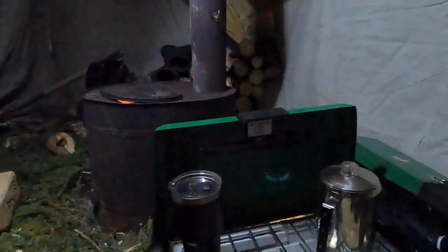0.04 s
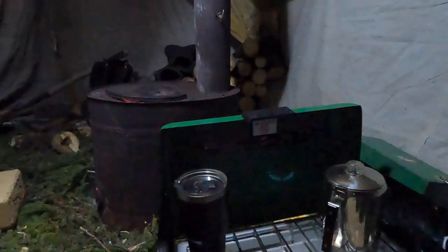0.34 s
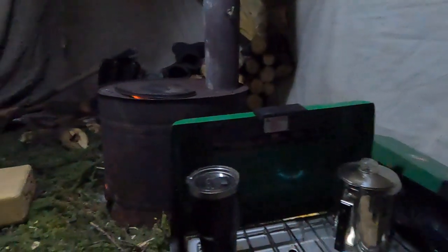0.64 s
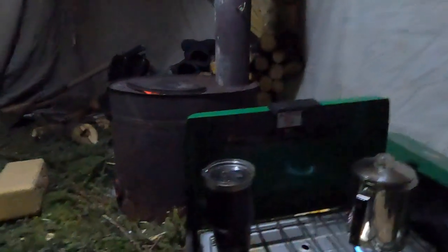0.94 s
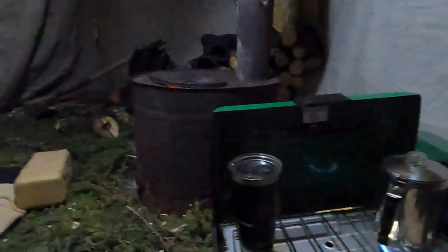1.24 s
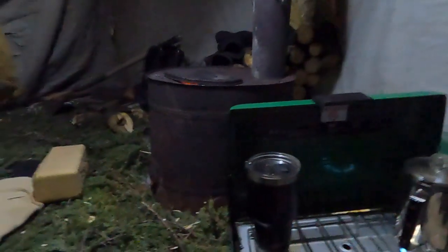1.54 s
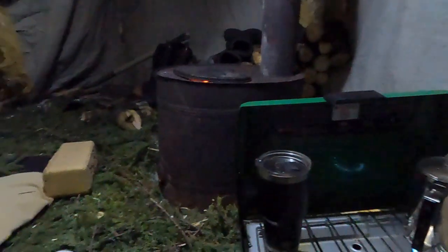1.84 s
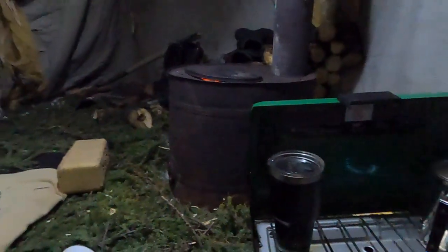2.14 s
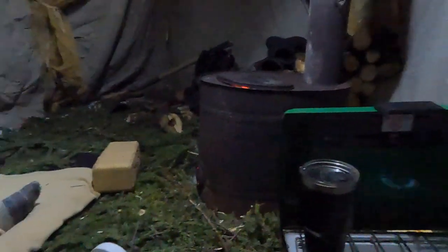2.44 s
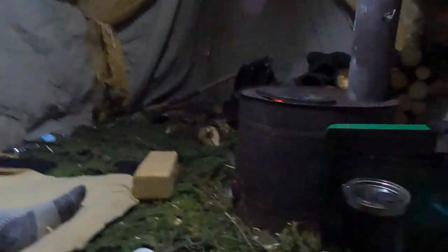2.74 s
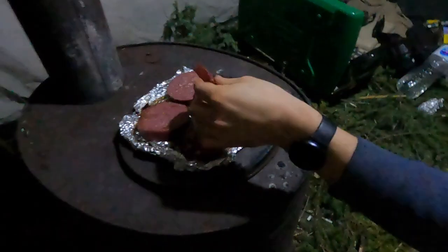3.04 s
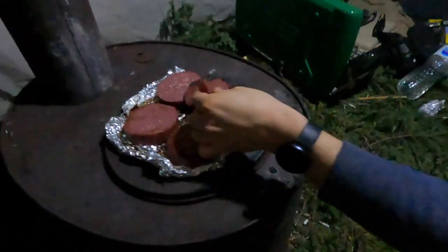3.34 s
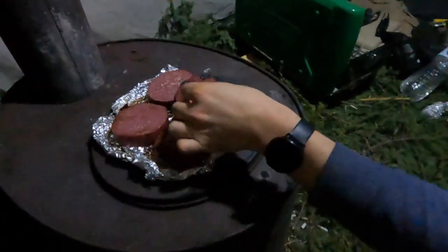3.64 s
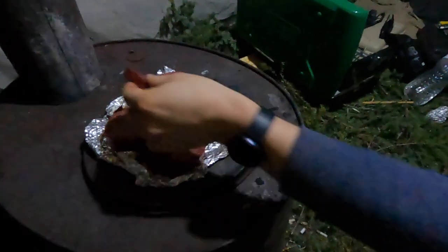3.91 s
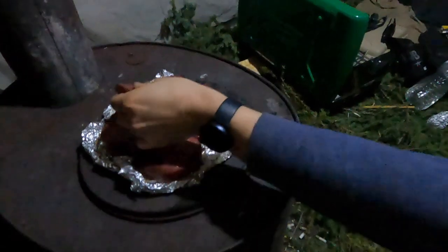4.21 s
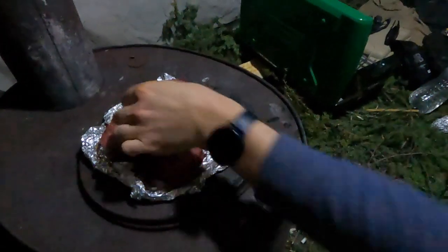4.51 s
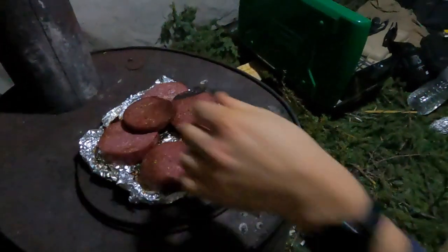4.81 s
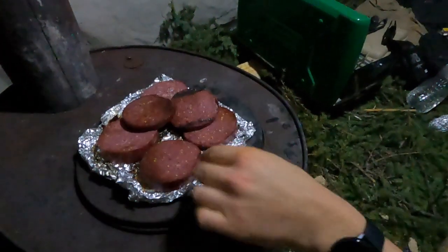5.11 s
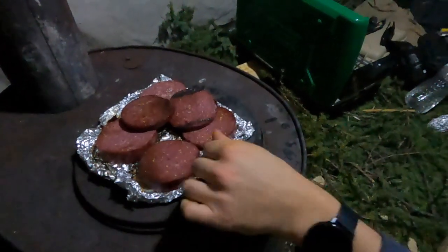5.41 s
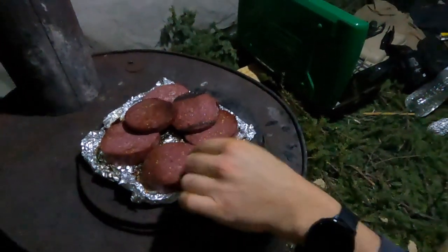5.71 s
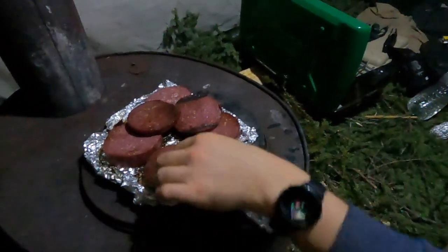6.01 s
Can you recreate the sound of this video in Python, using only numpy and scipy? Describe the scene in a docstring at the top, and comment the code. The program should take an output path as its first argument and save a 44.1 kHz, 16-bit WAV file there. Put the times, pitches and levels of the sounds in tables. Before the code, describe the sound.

A steel percolator bubbles and clacks on a gas camp stove, then meat slices sizzle and spit on foil on a wood stove.

```python
"""Steam bubbles thump in a steel percolator on a gas camp stove. Steam pockets collapse against the
metal; spurts gurgle up the stem and splash under the lid. After a short gap with one crackle, meat
sizzles close by on foil on a wood stove in a tent: countless tiny bursts of steam in hot fat.
Blisters spit, a hand lays a slice down, the frying flares and the stove top rings softly."""
import sys
import numpy as np
from scipy import signal
from scipy.fft import rfft, irfft, next_fast_len
from scipy.io import wavfile
from scipy.ndimage import map_coordinates

SR = 44100
rng = np.random.default_rng(int(sys.argv[2]) if len(sys.argv) > 2 else 0)


def file_out(sig):
    """Save sig as 16-bit WAV at sys.argv[1]."""
    # one column per channel
    cols = np.atleast_2d(sig).T
    # limit, then scale
    lim = np.clip(cols, -1, 1)
    pcm = np.round(lim * 32767).astype(np.int16)
    wavfile.write(sys.argv[1], SR, pcm)


N = 267246
TIME_S = np.arange(N) / SR
RING_S = np.arange(SR // 8) / SR  # time axis of one hit
POT_END_S, FRY_START_S, SLICE_LANDS_S = 2.846, 3.015, 4.403
SNAP_LEAD_S = .0015  # snap onset to peak

# Table levels are relative; each source adds its own gain.
# single steam bubbles (time [s], level [dB], pitch [Hz], decay [s])
STEAM_BUBBLES = [(.012, -26, 240, 0.0053), (0.075, -28, 238, .006), (.118, -39.5, 237, .009),
                 (.165, -34, 378, 0.0036), (.214, -27, 259, 0.0034), (.245, -25.5, 240, 0.006),
                 (.338, -22.5, 228, .005), (.395, -34, 203, 0.013), (0.472, -29.5, 230, 0.0068),
                 (0.525, -32, 211, 0.009), (0.541, -36, 235, 0.0074), (0.58, -30.5, 221, 0.012),
                 (0.643, -33.5, 234, 0.012), (0.858, -35, 257, .007), (0.906, -32.5, 249, 0.017),
                 (0.992, -40.5, 214, 0.0076), (1.110, -29.5, 241, 0.022), (1.25, -32.5, 237, 0.018),
                 (1.307, -29.5, 211, 0.0031), (1.378, -38.5, 260, 0.0089), (1.186, -26, 234, 0.0049),
                 (1.429, -20.5, 219, 0.01), (1.4435, -23, 230, 0.0077), (1.494, -19, 218, .008),
                 (1.554, -29, 231.4, 0.024), (1.656, -31.5, 235, 0.0054), (1.738, -32.5, 259, 0.01),
                 (1.797, -33, 198, 0.0093), (1.825, -34, 370, 0.0065), (1.880, -37.5, 260, .006),
                 (1.932, -40.5, 261, 0.0043), (1.980, -27, 226.5, 0.0055), (2.096, -23, 254, 0.01),
                 (2.217, -25, 227, 0.0094), (2.284, -33, 218, 0.0068), (2.391, -29, 220, 0.0085),
                 (2.445, -41, 249, 0.0067), (2.542, -34, 237, 0.01), (2.741, -29, 229, 0.0035),
                 (2.812, -35, 203, .006)]
# steam pockets collapsing on the metal (time [s], clack [dB], knock [dB], thump [dB])
STEAM_COLLAPSES = [(0.3008, -28, -39, -25.5), (0.3304, -26, -28, -36), (0.6929, -14.5, -24.5, -19),
                   (0.7176, -36, -47, -43), (0.7496, -42, -48, -43.5), (0.7788, -19, -22, -24),
                   (0.7869, -26, -25.5, -27.5), (0.8031, -43, -28, -23.5), (.817, -48, -32, -35),
                   (1.1618, -29.5, -27.5, -25), (1.173, -30, -32, -25), (1.19, -32, -31, -26.5),
                   (1.4268, -36, -29, -33.5), (1.4575, -26, -23, -22.5), (1.4733, -30, -26, -18.5),
                   (1.4984, -30.5, -38, -35), (1.5097, -21, -19.5, -19), (1.5328, -36, -41, -34),
                   (1.543, -47, -27.5, -27), (2.1102, -34.5, -30.5, -28.5), (2.182, -45, -23, -25),
                   (2.2072, -42, -32, -29.5), (2.247, -27.5, -43, -39.5), (2.6395, -32, -32, -32),
                   (2.6472, -20.5, -23.5, -18.5), (2.6987, -46, -29, -33), (2.7419, -38, -37, -29.5),
                   (2.7795, -46, -31, -34.5)]
# spurts up the stem (time [s], length [s], gurgle [dB])
STEM_SPURTS = [(0.314, .032, -37), (.682, .025, -40), (0.762, .058, -38.5), (1.141, .057, -39),
               (1.402, .122, -37.5), (2.091, 0.032, -46.5), (2.173, .066, -41.5), (2.629, .034, -39.5),
               (2.691, 0.093, -52.5)]
# hoots of the stem (time [s], length [s], level [dB])
STEM_HOOTS = [(0.086, 0.023, -38), (1.09, 0.056, -38), (1.864, 0.034, -38.5), (2.012, 0.125, -33),
              (2.59, 0.061, -39.5)]
# splashes under the lid (time [s], level [dB])
LID_SPLASHES = [(0.0615, -40), (0.147, -43), (0.627, -36), (1.039, -43), (1.362, -41.5), (1.4148, -37.5),
                (1.872, -35.5)]
# wisps of steam (time [s], decay [s], level [dB])
STEAM_WISPS = [(0.561, 0.008, -69), (1.088, 0.034, -59.5), (1.128, 0.017, -70), (2.0329, 0.008, -72),
               (2.114, 0.008, -64), (2.2584, 0.01, -61), (2.609, 0.011, -46), (2.645, 0.034, -57),
               (2.792, 0.0091, -62)]
# drops on hot steel (time [s], level [dB], pitch [Hz])
STRAY_DROPS = [(0.248, -49, 3980), (.3215, -55, 6000), (.3386, -52, 6100), (0.372, -40, 3140),
               (.3875, -54, 5900), (.4244, -57, 5600), (0.5607, -47.5, 6300), (0.7377, -50.5, 6100),
               (.7796, -51, 6100), (.9767, -50.5, 5670), (1.488, -58.5, 11060), (1.5105, -52.5, 6140),
               (1.784, -64, 11800), (1.817, -62.5, 11800), (2.034, -51, 6320), (2.1161, -58.5, 10660),
               (2.2625, -49, 5600), (2.6873, -46, 5700), (2.7926, -49, 5370)]
# resonances of the filled pot and lid (frequency [Hz], bandwidth [Hz], level [dB])
CLACK_MODES = [(2310, 100, 14.5), (2540, 80, -0.5), (2753, 39, 9.5), (2996, 95, 10), (3133, 79, 8.5),
               (2700, 530, -10.5)]
KNOCK_MODES = [(378, 24, 3), (716, 70, 2), (812, 330, -4.5), (1517, 35, -14)]
SPLASH_MODES = [(1228, 63, 17), (1410, 140, 0.5), (1436, 38, 20.3)]
# spectra of flame, steam and fine drops (frequency [Hz], gain [dB])
FLAME_SPECTRUM = [(25, -40.5), (50, -28), (80, -10), (110, -24.5), (160, -7), (230, -4), (330, -14.5),
                  (410, -7.5), (520, -11), (740, -16.5), (950, -23), (1500, -26.5), (1750, -26.5),
                  (6000, -44.5), (8500, -63), (12300, -60.5), (14500, -87)]
STEAM_SPECTRUM = [(2500, -9), (4000, -4.5), (5900, 2), (6700, 0), (7300, -1), (8200, -16), (12000, -15),
                  (14500, -39.5)]
SPATTER_SPECTRUM = [(400, -13), (1200, -2), (2600, 7), (3300, 1), (3800, -6.5), (4700, -28.5), (6100, -15),
                    (7500, -32), (9000, -46), (12000, -36), (14500, -60.5)]

# frying strength (time [s], level [dB])
SIZZLE_ENVELOPE = [(3.1, -38.5), (3.45, -37), (3.75, -35), (4.0, -30.5), (4.3, -30), (4.6, -31),
                   (4.9, -32.5), (5.02, -32), (5.42, -31.5), (5.68, -33), (6.03, -33.5)]
# spectra of the frying layers, low to high (frequency [Hz], gain [dB])
SPUTTER_SPECTRUM = [(30, -16), (70, -33), (130, -22), (190, -3.5), (270, -4), (450, -1), (900, -0.5),
                    (1400, 7.5), (2500, -43.5)]
SIZZLE_SPECTRUM = [(100, -22.5), (500, -14), (800, -7.5), (1400, 2.5), (2200, 7.5), (3000, 6.5), (4200, 6),
                   (6200, -10.5), (8500, -25.5), (12000, -41.5)]
SPRAY_SPECTRUM = [(2500, -36), (4200, 5.5), (5500, 5.5), (7000, -6.5), (8500, -17), (10500, -14.5),
                  (14500, -35)]
MIST_SPECTRUM = [(5000, -38), (8500, -13), (10000, 0), (12500, 7.5), (14500, -18.5)]
# fingers squeeze out juice (time [s], half width [s], spray boost [dB], sputter boost [dB])
FINGER_PRESSES = [(3.53, 0.1, -5, 5.5), (4.36, 0.26, 7.5, 3)]
# bursting fat blisters (time [s], level [dB], pitch [Hz], ping [0-1], air push [0-1])
FAT_SPITS = [(3.3015, -9.5, 3100, .25, 0), (3.4833, -14.5, 4100, .3, 0), (3.628, -16, 2600, .3, 0),
             (3.8446, -11, 2250, .3, 0), (3.8667, -11, 2900, .3, 0), (4.1755, -12, 4200, .3, 0),
             (4.2660, -9.5, 2150, .3, 0), (4.2748, -8, 2350, .2, .3), (4.2912, -13, 3000, .3, 0),
             (4.3078, -5.5, 4200, .3, .2), (4.3182, -11, 3500, .3, 0), (4.3718, -13, 3600, .3, 0),
             (4.3845, -13, 2600, .3, 0), (4.4157, -11, 4200, .3, 0), (4.4447, -14, 2500, .3, 0),
             (4.6922, -8, 2050, .1, .2), (4.7889, -15, 2450, .3, 0), (4.9494, -14, 2880, .3, 0),
             (4.9834, -14, 2250, .3, 0), (5.0405, -15, 3300, .3, 0), (5.065, -15, 2200, .3, 0),
             (5.2569, -12, 3180, .3, 0), (5.3203, -11, 2230, .4, 0), (5.3705, -10.5, 1250, .2, .3),
             (5.4502, -3, 3950, .6, .8), (5.636, -14, 4100, .3, 0), (5.7323, -17.5, 1300, .1, .6),
             (5.8937, -6, 4000, .45, .8), (5.9208, -14, 3300, .3, 0), (5.9677, -13.5, 2200, .2, 0),
             (6.0206, -14.5, 3000, .3, 0)]
# crackles of juice on hot foil (time [s], half width [s], level [dB], pitch [Hz])
JUICE_RUSHES = [(4.32, .14, -33, 3400), (4.72, .12, -41, 2300), (5.0, .04, -37, 2100),
                (5.07, .02, -38, 2100), (5.2, .04, -39, 2100), (5.3, .05, -38, 2200)]
# tiniest blisters (time [s], level [dB])
TINY_BLISTERS = [(4.4443, -26.5), (4.544, -33.5), (4.6448, -28.5), (4.7437, -30.5), (4.9618, -29),
                 (5.2763, -31.5), (5.353, -32.5), (5.8774, -32.5)]
# hand bumps on the stove (time [s], level [dB], pitch [Hz])
HAND_BUMPS = [(3.241, -49, 200), (3.329, -42.5, 199), (3.384, -35.5, 190), (3.4, -41.5, 85),
              (3.464, -40, 189), (3.501, -43, 224), (3.515, -50, 90)]
# stove top resonances (frequency [Hz], level [dB], T60 [s])
STOVE_MODES = [(250, 7, .62), (265, -3.5, 2.7), (406, 10, .35), (566, 5.5, .42), (720, 3, .16),
               (890, 6, .15)]
# reflections off stovepipe, hand and canvas (delay [s], gain [dB])
TENT_REFLECTIONS = [(.0019, -53), (.0034, -36.5), (.0057, -53), (.0083, -21.5), (0.0144, -26.5)]


def boiling(churn_per_s=44, churn_db=9.5):
    """Bubbles plop singly, at each collapse and in trains at each spurt; small ones simmer and tick."""
    out = np.zeros(N)
    for s, db, hz, decay_s in STEAM_BUBBLES:
        add(out, s - .001, amp(db) * plop(hz, decay_s))
    for s, _, _, thump_db in STEAM_COLLAPSES:
        add(out, s - .001, sized_bubble(thump_db))
    for s, length_s, db in STEM_SPURTS:
        count = max(1, round(length_s * churn_per_s))
        for progress in (np.arange(count) + rng.uniform(.15, .85, count)) / count:
            swell = np.sqrt(np.sin(np.pi * progress))
            add(out, s + progress * length_s, swell * sized_bubble(db + churn_db))
    simmer = convolve(pulses(50, 2), ring([(222, 45, 0), (280, 50, -6), (395, 40, -6)], attack_s=.002))
    ticks = sum(amp(3 * wobble(9)) * convolve(pulses(28, 3), ring([(hz, 120, 0)], attack_s=.001))
                for hz in (720, 1130, 1330, 1480, 1560))
    stove_note = convolve(out, ring([(85, 11, 0)], attack_s=.0075))
    return out + amp(-52) * unit(simmer) + amp(-57.5) * unit(ticks) + amp(-71.5) * unit(stove_note)


def plop(hz, decay_s):
    """A steam bubble swells, so its note sinks; the pot heaves a little."""
    note = thump(hz, rise_s=.003, decay_s=decay_s, bend=.7, settle_s=.003)
    heave = thump(139.6, rise_s=.0014, decay_s=.0096, bend=.19, settle_s=.0028)
    return note + .18 * heave


def sized_bubble(db, base_hz=174, hz_per_db=2):
    """A stronger bubble is larger, hence lower."""
    hz = (base_hz - hz_per_db * db) * np.exp(.11 * rng.standard_normal())
    return amp(db) * plop(hz, decay_s=.0091)


def perking(rattle_db=-11):
    """Steam pockets collapse; slugs of coffee rise up the stem, rattle the pot and splash the lid."""
    out = np.zeros(N)
    for s, clack_db, knock_db, _ in STEAM_COLLAPSES:
        clack = ring(CLACK_MODES, attack_s=.001, detune=.006)
        splat = ring([(2800, 800, 0)], attack_s=.0006, detune=.05)
        cave_in = ring(CLACK_MODES, attack_s=.001, detune=.08)
        knock = ring(KNOCK_MODES, attack_s=.00085, detune=.049)
        add(out, s - .0025, amp(clack_db - 16) * cave_in)
        add(out, s, amp(clack_db - 3.5) * clack)
        add(out, s + .000692, amp(clack_db - 6.5) * splat)
        add(out, s - .001, amp(knock_db - 1) * knock)
    rattle_modes = CLACK_MODES + [(3000, 900, -2)]
    for s, length_s, db in STEM_SPURTS:
        gurgle = flurry(KNOCK_MODES, length_s, per_s=200, spread_db=3, attack_s=.0012, detune=.05)
        rattle = flurry(rattle_modes, length_s, per_s=130, spread_db=3, attack_s=.0008, detune=.006)
        add(out, s, amp(db) * (gurgle + amp(rattle_db) * rattle))
    for s, db in LID_SPLASHES:
        add(out, s, amp(db + 1.5) * ring(SPLASH_MODES, attack_s=.00048, detune=.022))
        drops = flurry(SPLASH_MODES, length_s=.04, per_s=350, spread_db=2, attack_s=.0005, detune=.1)
        add(out, s - .004, amp(db - 15.5) * drops)
    return out


def frying(melt_s=.65):
    """Tiny steam bursts in hot fat sizzle; spray, sputter and stereo mist grow as the fat melts."""
    sizzle_db = np.interp(TIME_S, *np.transpose(SIZZLE_ENVELOPE))
    cold = np.exp(-np.maximum(TIME_S - FRY_START_S, 0) / melt_s)
    spray_db = sizzle_db - 8 - 8 * cold
    sputter_db = sizzle_db - 13 - 11.5 * cold
    mist_db = sizzle_db - 23.5 - 23 * cold
    for s, half_width_s, spray_boost_db, sputter_boost_db in FINGER_PRESSES:
        press = gaussian(s, half_width_s)
        spray_db += spray_boost_db * press
        sputter_db += sputter_boost_db * press
    flicker_db = .18 * wobble(25)
    small_bursts = patter(SIZZLE_SPECTRUM, per_s=8000, spread_db=3.5)
    large_bursts = np.zeros(N)
    for hz in np.geomspace(1650, 4400, num=6):
        blister = unit(ring([(hz, .4 * hz, 0)], attack_s=.00022))
        large_bursts += amp(2.5 * wobble(14)) * convolve(pulses(100, 4.5), blister)
    sizzle = amp(sizzle_db + flicker_db) * (small_bursts + amp(-4) * unit(large_bursts))
    spray = amp(spray_db + flicker_db) * patter(SPRAY_SPECTRUM, per_s=5000, spread_db=6)
    sputter = amp(sputter_db + 2.6 * wobble(18)) * patter(SPUTTER_SPECTRUM, per_s=3200, spread_db=1)
    return sizzle + spray + sputter + fat_mist(mist_db)


def fat_mist(db):
    """The finest bursts: a haze with single pricks, its top in antiphase between the ears."""
    haze = patter(MIST_SPECTRUM, per_s=3400, spread_db=.5)
    pricks = patter(MIST_SPECTRUM, per_s=70, spread_db=6)
    mid = amp(1) * (haze + pricks / 2)
    side_spectrum = [(3000, -28), (10200, -28.5), (11200, 1.5), (12500, 15.5), (14500, -3)]
    side = patter(side_spectrum, per_s=7000, spread_db=5.5) * np.array([[1], [-1]])
    balance = amp([[-.8], [.8]])
    return amp(db + 2.8 * wobble(24)) * (mid + side) * balance


def spits():
    """Fat blisters snap, singly or in rushes; large ones add a low pop and a push of air."""
    out = np.zeros(N)
    pop = thump(1400, rise_s=.0002, decay_s=.0005, bend=.6, settle_s=.0005)
    push = thump(290, rise_s=.0004, decay_s=.003, bend=3.5, settle_s=.001)
    for s, db, hz, ping, air in FAT_SPITS:
        add(out, s + .0002 - SNAP_LEAD_S, amp(db) * snap(hz, ping))
        add(out, s, amp(db) * air * (push / 12.5 - pop / 3.5))
    for s, half_width_s, db, hz in JUICE_RUSHES:
        rush = sum(convolve(pulses(60, 3), snap(ratio * hz)) for ratio in (.75, 1, 1.3))
        out += amp(db) * gaussian(s, half_width_s) * unit(rush)
    for s, db in TINY_BLISTERS:
        add(out, s + .001, amp(db) * ring([(11800, 1500, 0)], attack_s=.0001, detune=.04))
    return out


def snap(hz, ping=.2, half_width_cycles=.52, decay_cycles=3.2):
    """A blister bursts: one sharp pressure swing, then a brief ping."""
    cycles = (RING_S - SNAP_LEAD_S) * hz
    cycles_after = np.maximum(cycles, 0)
    wave = np.cos(2 * np.pi * cycles)
    dc_offset = np.exp(-(np.pi * half_width_cycles) ** 2)
    swing = np.exp(-(cycles / half_width_cycles) ** 2) * (wave - dc_offset)
    tail = (1 - np.exp(-cycles_after ** 2)) * np.exp(-cycles_after / decay_cycles) * wave
    return -swing - ping * tail


def hand(ring_db=-43):
    """Knuckles bump the stove; a slice lands with a dull pat and the iron top rings."""
    bumps = np.zeros(N)
    for s, db, hz in HAND_BUMPS:
        add(bumps, s, amp(db) * thump(hz, rise_s=.0031, decay_s=.011, bend=.074, settle_s=.0015))
    age_s = np.maximum(TIME_S - SLICE_LANDS_S, 0)
    pat_spectrum = [(30, -25), (80, -1), (170, -22), (400, 2),
                    (650, 5), (900, 5), (1300, -6), (6000, -59)]
    pat = amp(-30) * np.exp(-age_s / .03) * patter(pat_spectrum, per_s=1800, spread_db=5.5)
    iron = sum(amp(db - 60 * age_s / t60_s + 2.4 * wobble(45)) * np.sin(2 * np.pi * hz * age_s)
               for hz, db, t60_s in STOVE_MODES)
    # bubbling fat sustains the plate's low note
    hum = unit(convolve(pulses(300, .5), ring([(272, 15, 0)])))
    onset = 1 - np.exp(-age_s / .013)
    return bumps + onset * (pat + amp(ring_db) * iron + amp(-54.5 - 12 * age_s) * hum)


def spatter(shower_db=-14.5, linger_s=.02):
    """Fine drops fly around each spurt; strays spit on the hot steel."""
    shower = sum(amp(db + shower_db) * gaussian(s + length_s / 2, length_s / 2 + linger_s)
                 for s, length_s, db in STEM_SPURTS)
    out = shower * patter(SPATTER_SPECTRUM, per_s=900, spread_db=4)
    for s, db, hz in STRAY_DROPS:
        modes = [(hz, hz / 9, 0), (.7 * hz, hz / 6, -10)]
        pings = flurry(modes, length_s=.014, per_s=600, spread_db=2.5, attack_s=.0003, detune=.05)
        add(out, s - .004, amp(db - 2.5) * peak(pings))
    return out


def stem_hoots(hz=405):
    """Air in the stem sounds a brief, wavering note."""
    swell = sum(amp(db) * np.interp((TIME_S - s) / length_s, [0, .06, .8, 1], [0, .6, 1, 0])
                for s, length_s, db in STEM_HOOTS)
    phase = 2 * np.pi * np.cumsum(hz * (1 + .0098 * wobble(60))) / SR
    return amp(1.4 * wobble(100)) * swell * np.sin(phase)


def burner(db=-46.5):
    """The gas flame rushes with a slight flutter."""
    flutter_db = 1.1 * wobble(22)
    return amp(db + flutter_db) * unit(colour(rng.standard_normal(N), FLAME_SPECTRUM))


def steam(spurt_fizz_db=-42.5):
    """Steam fizzes in wisps and with each spurt, over faint ticks."""
    puffs = np.zeros(N)
    for s, decay_s, db in STEAM_WISPS:
        onset = 1 - np.exp(-RING_S / (.087 * decay_s))
        add(puffs, s, amp(db) * onset * np.exp(-RING_S / decay_s))
    for s, length_s, db in STEM_SPURTS:
        add(puffs, s, amp(db + spurt_fizz_db) * np.hanning(int(length_s * SR)))
    fizz = patter(STEAM_SPECTRUM, per_s=4000, spread_db=7.5)
    ticks = patter(MIST_SPECTRUM, per_s=40, spread_db=5)
    return puffs * fizz + amp(-96) * ticks


def crackle(start_s=2.8765, end_s=2.8875, db=-44):
    """One short noise burst in the gap between pot and frying."""
    gate = (TIME_S > start_s) & (TIME_S < end_s)
    burst = colour(gate * rng.standard_normal(N), SIZZLE_SPECTRUM)
    return amp(db) * burst / np.std(burst[gate])


def tent_echoes(x):
    """Weak early reflections; canvas and a floor of boughs leave no tail."""
    out = x.copy()
    for delay_s, db in TENT_REFLECTIONS:
        lag = round(delay_s * SR)
        out[..., lag:] += amp(db) * x[..., :-lag]
    return out


def ring(modes, attack_s=.0011, scatter_db=1.5, detune=0):
    """One cushioned blow on modes (frequency [Hz], bandwidth [Hz], level [dB]), randomly varied."""
    hz, width_hz, db = np.transpose(modes)[:, :, None]
    hz = hz * np.exp(detune * rng.standard_normal(hz.shape))
    polarity = (-1) ** np.arange(len(hz))[:, None]
    gain = polarity * width_hz * amp(db + scatter_db * rng.standard_normal(hz.shape))
    partials = gain * np.exp(-np.pi * width_hz * RING_S) * np.sin(2 * np.pi * hz * RING_S)
    onset = 1 - np.exp(-(RING_S / attack_s) ** 2)
    return peak(onset * partials.sum(axis=0))


def thump(hz, rise_s, decay_s, bend, settle_s):
    """A damped swing whose pitch sinks to hz."""
    pitch_hz = hz * (1 + bend * np.exp(-RING_S / settle_s))
    envelope = (1 - np.exp(-(RING_S / rise_s) ** 2)) * np.exp(-RING_S / decay_s)
    return peak(envelope * np.sin(2 * np.pi * np.cumsum(pitch_hz) / SR))


def flurry(modes, length_s, per_s, spread_db, attack_s, detune):
    """An uneven run of small hits that swells and fades; energy of rms 1 over length_s."""
    out = np.zeros(SR // 2)
    hits = max(3, int(length_s * per_s))
    progresses = (np.arange(hits) + rng.random(hits)) / hits
    sizes = amp(spread_db * rng.standard_normal(hits))
    for progress, size in zip(progresses, sizes):
        hit = size * ring(modes, attack_s, detune=detune)
        add(out, progress * length_s, np.sin(np.pi * progress) * hit)
    return out / np.sqrt(np.sum(out ** 2) / (length_s * SR))


def patter(spectrum, per_s, spread_db):
    """Random impulses shaped by a spectrum; rms 1."""
    return unit(colour(pulses(per_s, spread_db), spectrum))


def pulses(per_s, spread_db):
    """Random impulses of log-normal size; rms 1."""
    places = np.flatnonzero(rng.random(N) < per_s / SR)
    sizes = amp(spread_db * np.clip(rng.standard_normal(N)[places], -2.5, 2.5))
    return unit(np.bincount(places, sizes * (-1.0) ** places, N))


def colour(x, spectrum, size=16384):
    """Minimum-phase filter through (frequency [Hz], gain [dB]) points."""
    hz, db = np.transpose(spectrum)
    gain_db = np.interp(np.log(np.fft.rfftfreq(size, 1 / SR) + 1), np.log(hz + 1), db)
    cepstrum = irfft(np.log(amp(gain_db) + 1e-6))[:size // 2]
    cepstrum[0] /= 2
    response = irfft(np.exp(rfft(2 * cepstrum, size)))[:size // 2]
    return convolve(x, response)


def wobble(knots_per_s):
    """Smooth random curve."""
    knots = rng.standard_normal(int(N * knots_per_s / SR) + 4)
    return map_coordinates(knots, [TIME_S * knots_per_s])


def gaussian(centre_s, half_width_s):
    return np.exp(-((TIME_S - centre_s) / half_width_s) ** 2)


def convolve(x, response):
    return signal.oaconvolve(x, response)[:N]


def add(track, start_s, sound):
    start = max(0, round(start_s * SR))
    span = track[start:start + len(sound)]
    span += sound[:len(span)]


def amp(db):
    return 10 ** (np.asarray(db) / 20)


def unit(x):
    return x / np.sqrt(np.mean(x ** 2) + 1e-20)


def peak(x):
    return x / (np.abs(x).max() + 1e-20)


def scene():
    """The percolator cuts off, one crackle sounds, the frying fades in."""
    coffee = boiling() + perking() + spatter() + stem_hoots() + burner() + steam()
    meat = tent_echoes(frying() + spits()) + hand()
    fade_out = np.clip((POT_END_S - TIME_S) / .0035, 0, 1)
    fade_in = np.clip((TIME_S - FRY_START_S) / .064, 0, 1) ** 2
    return coffee * fade_out + crackle() + meat * fade_in


def record(dry):
    """Microphone response: bass roll-off, narrow treble notch, band limit."""
    bass_hz, notch_hz, top_hz = 42, 9020, 14900
    size = next_fast_len(N + SR // 4)
    hz = np.fft.rfftfreq(size, 1 / SR)
    high_pass = hz ** 2 / (hz ** 2 + bass_hz ** 2)
    notch = amp(-26 * np.exp(-((hz - notch_hz) / 200) ** 2))
    return irfft(rfft(dry, size) * high_pass * notch * (hz < top_hz), size)[:, :N]


dry = scene()
out = record(dry)
file_out(out)
```